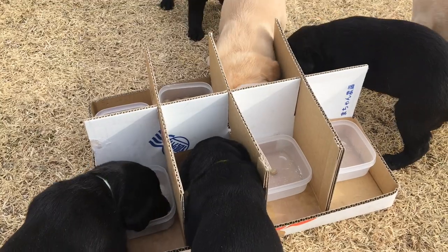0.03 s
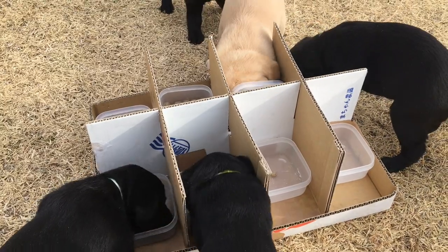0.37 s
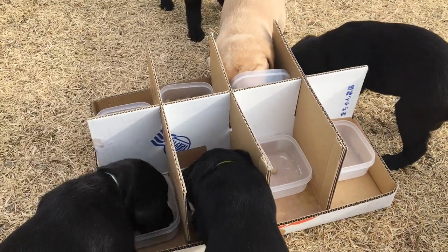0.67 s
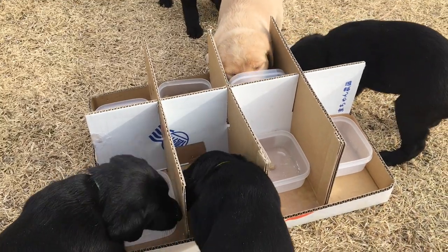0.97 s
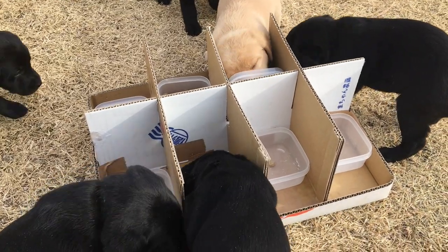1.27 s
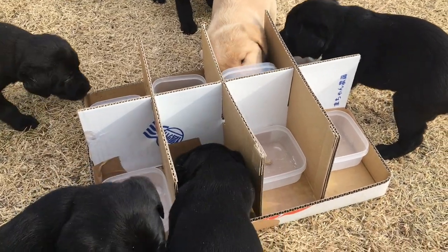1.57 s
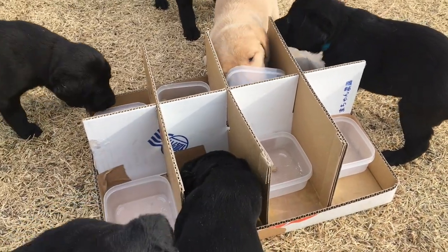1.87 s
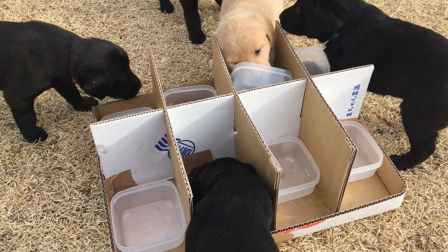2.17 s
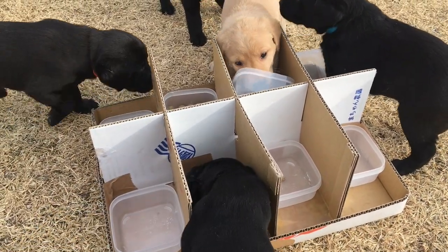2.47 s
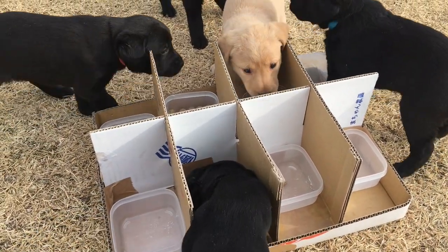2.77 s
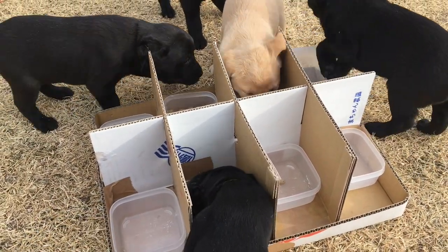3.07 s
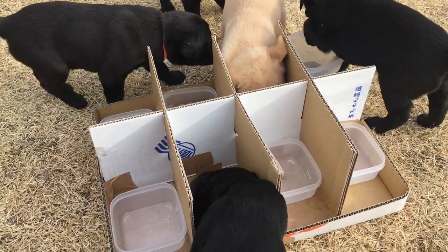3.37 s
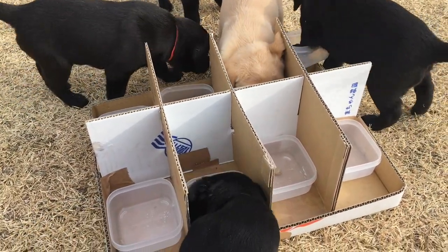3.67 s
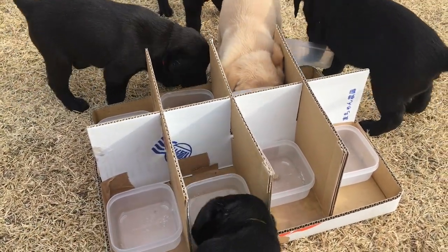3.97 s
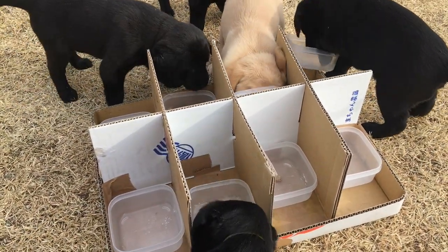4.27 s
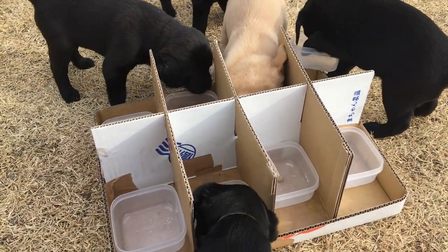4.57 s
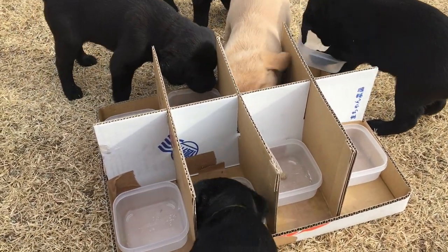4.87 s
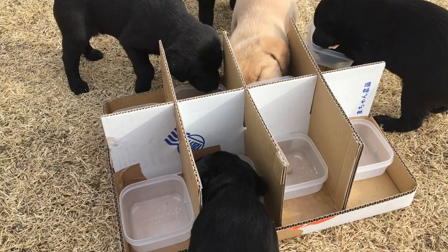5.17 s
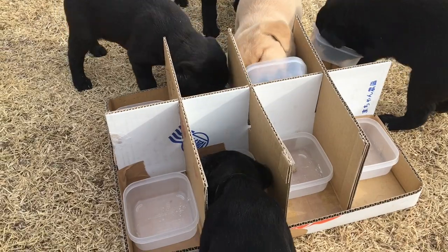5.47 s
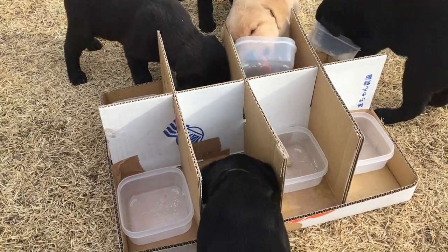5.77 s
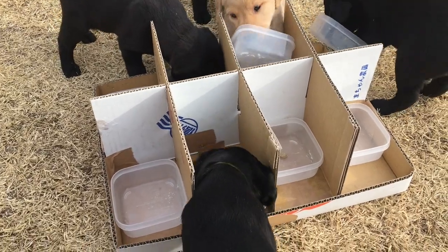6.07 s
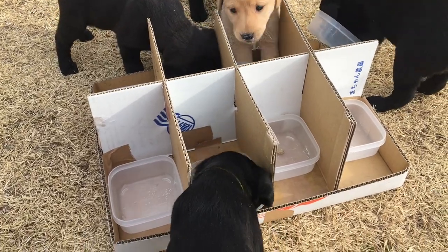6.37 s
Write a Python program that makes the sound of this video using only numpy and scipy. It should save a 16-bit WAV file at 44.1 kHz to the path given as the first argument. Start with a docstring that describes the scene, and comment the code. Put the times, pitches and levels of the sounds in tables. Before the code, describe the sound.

Puppies lick and nose empty plastic tubs in a cardboard box, with close hollow knocks, sharp clicks and wet smacks outdoors.

```python
"""Empty plastic tubs knock about in a divided cardboard box as puppies lick and nose them, close up.
Each knock rings a tub's thin floor and thumps the card; teeth and claws snap on the rims, and wet
tongues drag the tubs and smack. Fur brushes the dividers and paws crackle in the dry lawn around the box.
One microphone in the open, with quiet outdoor air and a low hum far off."""
import sys
import numpy as np
from scipy import signal
from scipy.fft import rfft, irfft
from scipy.io import wavfile
from scipy.ndimage import uniform_filter1d

SR = 44100
rng = np.random.default_rng(int(sys.argv[2]) if len(sys.argv) > 2 else 0)


def bounce(signal):
    """Save signal as a 16-bit WAV file at the path given by the first command-line argument."""
    frames = np.transpose(np.atleast_2d(signal))
    limited = np.clip(frames, -1, 1)
    pcm = np.round(limited * 32767).astype(np.int16)
    wavfile.write(sys.argv[1], SR, pcm)


N = 283563

# a tub knocks on the card: start_s, tub_db, centre_hz, box_db, clack_db, decay_factor
TUB_KNOCKS = [(0.086, -50, 640, -35.5, -52, 2.6), (0.102, -29.5, 660, -38.5, -57, 0.8),
              (0.112, -37, 800, -51, -44, 1.1), (0.151, -32, 1030, -40, -35.5, 1.15),
              (0.164, -33.5, 670, -33.5, -48, 1.2), (0.283, -47, 760, -70, -55, 1.06),
              (0.459, -42, 840, -51, -48, 1.5), (0.552, -43, 840, -64, -39, .75),
              (0.566, -32, 730, -42, -45, 1.4), (0.615, -43.5, 586, -65, -60, 1.2),
              (0.713, -37.5, 815, -45, -52, 1.1), (0.865, -49.5, 740, -51, -70, 1.15),
              (0.917, -43.5, 560, -45, -70, .5), (1.306, -60, 750, -48, -62, 1.2),
              (1.3221, -39.5, 740, -42.5, -43.5, 1.2), (1.563, -44, 690, -54, -60, .9),
              (1.869, -40, 600, -49, -51, 1.1), (1.881, -38, 664, -37, -46.5, 0.7),
              (2.226, -45.5, 670, -44.5, -65, 1.2), (2.308, -52, 600, -54, -57, 0.82),
              (2.4404, -47, 600, -46.5, -67, 0.46), (2.6236, -23.5, 780, -34.5, -38.5, 1.16),
              (2.6731, -26.5, 786, -40.5, -42, 1.1), (2.687, -34.5, 710, -37, -52, 0.42),
              (2.705, -38, 660, -45, -45, 0.86), (2.741, -44, 640, -58, -49, 0.94),
              (2.7602, -31, 660, -39, -43, .8), (3.001, -48.5, 814, -57, -67, 1),
              (3.111, -46, 850, -44.5, -64, 1), (3.1583, -32.5, 930, -27.5, -30.5, 1.1),
              (3.167, -30, 750, -34.5, -40, 0.87), (3.334, -34.5, 595, -31.5, -59, 0.62),
              (3.392, -39, 1110, -38.5, -42, 1.04), (3.441, -40, 620, -35.5, -52, 1),
              (3.56, -39, 680, -45, -60, 0.99), (3.633, -51, 640, -42, -45, 1.1),
              (3.652, -49.5, 760, -45, -44, 1.7), (3.993, -50, 1060, -44.5, -38, 0.66),
              (4.345, -33, 540, -60, -51, 0.47), (4.3695, -17, 795, -30, -32.5, 0.73),
              (4.38, -48, 550, -33, -45, 0.6), (4.393, -42, 800, -39, -71, 1),
              (4.412, -48, 500, -41, -74, 1.1), (4.485, -37.5, 580, -64, -59, 0.39),
              (4.614, -45, 580, -36, -39.5, 1), (4.6573, -21.5, 850, -30, -37.5, 0.87),
              (4.7004, -33.5, 493, -64, -43.5, 0.99), (4.7733, -39.5, 570, -50, -55, 1.1),
              (4.834, -32.5, 610, -43, -49, 1.3), (4.904, -39.5, 720, -50, -49, 1.4),
              (4.97, -44.5, 950, -53, -51.5, 1.3), (5.219, -44, 595, -52, -56, 0.16),
              (5.342, -40.5, 615, -46, -43.5, 0.8), (5.428, -35, 695, -44.5, -42.5, 1.1),
              (5.45, -44.5, 870, -46, -51, .8), (5.553, -43.5, 950, -66, -49, 1.4),
              (5.609, -26, 585, -47, -55, 0.68), (5.625, -29, 750, -34.5, -39.5, 0.76),
              (5.682, -41, 955, -54, -44.5, 1.3), (5.7124, -34, 710, -41, -56, .9),
              (5.72, -40, 840, -43, -46, 2.4), (5.8168, -33.5, 865, -46, -32.5, 0.83),
              (5.839, -33.5, 830, -60, -37, 1), (5.849, -32.5, 694, -38, -40, .7),
              (5.857, -38, 580, -31.5, -48, 1.3), (5.8744, -32.5, 640, -51, -67, 0.51),
              (6.219, -48, 710, -42.5, -50, 1), (6.2668, -22, 550, -25.5, -38, 0.38),
              (6.3433, -47, 700, -61, -49, 0.6), (6.366, -15, 840, -31.5, -26, 0.69),
              (6.379, -31, 600, -57, -49, 0.49), (6.393, -35, 640, -61, -49, 1),
              (6.407, -35, 657, -53, -63, 0.97)]
# teeth and claws on a rim: start_s, peak_db, centre_hz
RIM_SNAPS = [(0.0438, -39.5, 3320), (0.148, -35, 3500), (0.5515, -39, 3990), (0.9004, -44.5, 4420),
             (1.2769, -42.5, 3640), (1.322, -35.5, 3900), (1.954, -40, 6700), (2.7063, -37, 4550),
             (3.0985, -38, 3650), (3.1577, -29.5, 3950), (3.3885, -40.5, 3920), (3.651, -33, 12800),
             (3.875, -42, 4320), (4.0093, -33, 12900), (4.3701, -37, 9000), (4.658, -33.5, 11000),
             (4.768, -41.5, 3900), (5.2846, -41, 11300), (5.3412, -23.5, 5700), (5.924, -33.5, 9000),
             (5.9393, -35.5, 3400), (6.2046, -38.5, 4080), (6.243, -40, 4230), (6.2567, -44, 12000),
             (6.2668, -27.5, 7600), (6.3665, -17.5, 5870)]
# pushes of a tongue or muzzle across a tub: middle_s, length_s, rub_db, wet_db
TONGUE_STROKES = [(0.05, 0.26, -53.5, -60), (0.41, 0.24, -57.5, -59), (0.64, 0.33, -59.5, -60),
                  (1.067, 0.13, -59, -62.5), (1.416, 0.13, -57, -63), (1.671, 0.31, -63.5, -55.5),
                  (1.899, 0.11, -51.5, -55.5), (2.172, 0.33, -68, -59.5), (2.555, 0.15, -66, -68),
                  (2.745, 0.11, -55.5, -72), (2.89, 0.06, -69, -65), (3.128, 0.17, -54.5, -53),
                  (3.465, 0.11, -52.5, -56), (3.608, 0.25, -53, -57), (3.885, 0.17, -61, -54.5),
                  (3.983, 0.12, -53, -51), (4.132, .16, -63, -59), (4.359, 0.21, -51, -65),
                  (4.85, .2, -50.5, -62.5), (5.17, 0.4, -52, -58.5), (5.435, .16, -54.5, -57),
                  (5.66, 0.42, -53, -64), (5.822, 0.21, -51.5, -51.5), (6.068, .07, -60, -84),
                  (6.351, 0.19, -55, -57)]
# smacks of lips and tongues: start_s, peak_db, pitch_hz
LIP_SMACKS = [(0.3292, -39, 1920), (0.334, -37, 1440), (0.4453, -36.5, 1370), (0.504, -41.5, 1180),
              (0.726, -42, 1750), (0.795, -43, 1380), (1.152, -37, 1220), (1.951, -41.5, 1940),
              (4.1798, -46, 1240), (5.199, -39.5, 1350), (6.089, -41.5, 1080)]
# fur and muzzles along walls and tubs: start_s, length_s, level_db, centre_hz, width_octaves
FUR_BRUSHES = [(0.347, 0.12, -62, 2950, 0.24), (0.612, 0.097, -57, 9300, 0.099),
               (0.639, 0.1, -62.5, 3550, 0.14), (0.63, 0.12, -67, 5700, 0.12), (.63, .11, -64, 13000, .25),
               (1.326, 0.059, -49.5, 603, 0.11), (1.646, 0.068, -54, 587, 0.22),
               (2.576, 0.048, -55, 1700, 0.17), (3.093, 0.067, -56, 1150, 0.54),
               (3.86, 0.072, -50.5, 1990, 0.093), (3.859, 0.064, -52.5, 3250, 0.52),
               (3.861, 0.057, -54.5, 6560, 0.65), (4.279, 0.069, -65, 3600, 0.027),
               (4.801, 0.13, -54.5, 576, 0.18)]
# a paw shifts in the grass: middle_s, length_s, level_db
PAW_STEPS = [(0.07, .22, -60.5), (0.4, 0.14, -62.5), (0.69, .14, -56.5), (0.87, 0.25, -64.5),
             (1.07, 0.11, -63.5), (1.54, 0.42, -62.5), (2.01, 0.22, -62), (2.66, 0.21, -62.5),
             (3.14, 0.11, -51.5), (3.31, 0.28, -60), (3.64, 0.1, -57.5), (3.94, 0.13, -58),
             (4.17, 0.1, -65), (4.45, 0.29, -67.5), (4.84, 0.31, -62), (5.14, 0.18, -59.5),
             (5.36, 0.12, -58), (5.6, 0.35, -62), (5.8, 0.23, -55), (5.96, .08, -56.5), (6.31, 0.37, -69)]
# modes of a tub's thin floor, the card box and a stiff rim: pitch_hz, level_db, t60_s
TUB_MODES = [(346, 2.5, 0.041), (437.5, -2.5, 0.058), (529.5, -1, 0.075), (627, -8, 0.053),
             (656, 9.5, 0.019), (751, 5.5, 0.018), (808, 1.5, 0.02), (867, -0.5, 0.035), (1015, 6.5, 0.024),
             (1100, 5.5, 0.016), (1264, 4.5, 0.028), (1363, -11.5, 0.096), (1570, -31, 0.085)]
BOX_MODES = [(204.5, -1.5, 0.033), (259, -6.5, 0.058), (281, 7.5, 0.017), (336, -8.5, 0.037),
             (397, -7, 0.063)]
RIM_MODES = [(1440, 16, 0.017), (2180, -0.5, 0.027), (3230, -2, 0.0088), (3655, 0, 0.02),
             (4050, -3.5, 0.02), (6500, -30, 0.02), (6610, -2.5, 0.0087), (7630, -4.5, 0.0097),
             (9230, 2, 0.0039), (11600, -17, 0.005), (12700, 6, 0.0073)]
# resonances of a tub pressed and dragged on the card: centre_hz, width_hz, level_db
RUB_RESONANCES = [(246, 250, -4.5), (553, 240, 0), (706, 150, -1.5), (990, 150, -10.5), (1442, 270, -12.5)]
# spectra of rim clack, wet tongue and outdoor air at the microphone: frequency_hz, level_db
CLACK_SPECTRUM = [(700, -21.5), (1300, -1), (1700, 4.5), (2050, -0.5), (2450, -5.5), (3200, -8),
                  (4200, -14.5), (5200, -18), (9000, -62.5)]
LICK_SPECTRUM = [(400, -34), (800, -6), (1100, -1), (1600, -4), (2000, -3), (2450, -8.5), (3100, -8.5),
                 (3900, -17.5), (5000, -14), (9000, -20.5)]
AIR_SPECTRUM = [(15, -41), (25, -13), (64, 2), (108, -2), (190, -1), (354, -9.5), (659, -13.5),
                (1700, -18.5), (2610, -24), (4370, -25), (4870, -50.5), (6050, -28), (10400, -29),
                (13200, -25.5), (16000, -31)]
# contact tick and dry grass crackle, both with the microphone's notches near 5, 7.3 and 10.3 kHz:
# frequency_hz, level_db
TICK_AT_MIC = [(1500, -18), (3500, -6), (5000, -10.5), (6100, 3.5), (7400, -3), (8500, 0), (10200, -10.5),
               (11300, 0), (13500, -26), (16000, -7)]
GRASS_AT_MIC = [(1500, -28), (3500, 5.5), (5000, 1), (6200, 5), (7400, 0.5), (8800, 5.5), (10300, 0.5),
                (11500, 4), (16000, 1)]
# short ring of the box's compartments: frequency_hz, t60_s
COMPARTMENT_DECAY = [(150, 0.18), (600, 0.051), (1500, 0.044), (4000, 0.028), (14000, 0.03)]


def knock(tub_db, centre_hz, box_db, clack_db, decay_factor):
    """A nudged tub ticks on the card, its rim clacks, its floor rings and the box thumps."""
    t = np.arange(SR // 8) / SR
    # the tick grows with ring and clack, and is sharper when the tub is held tight and rings briefly
    tick_db = (tub_db + clack_db) / 2 - 18.5 - 10.5 * (decay_factor - 1)
    tub = ring(TUB_MODES, t, decay_factor, lag=0.029, centre_hz=centre_hz, octaves=0.71, flex=0.052)
    box = ring(BOX_MODES, t, decay_factor, lag=0.016, centre_hz=260, octaves=0.92, flex=0.072)
    out = amp(tub_db) * tub + amp(box_db) * box
    add(out, .0004, amp(clack_db) * chatter(CLACK_SPECTRUM, t, t60_s=0.027 * decay_factor))
    add(out, .0004, amp(tick_db) * chatter(TICK_AT_MIC, t, t60_s=0.015 * decay_factor))
    return out


def tub_knocks():
    """The tubs are shoved against the walls and floor of the box."""
    out = np.zeros(N)
    for start_s, *blow in TUB_KNOCKS:
        add(out, start_s, knock(*blow))
    return out


def tub_rattles(per_s=7, most_per_stroke=3):
    """Each stroke may rattle its tub a few times; harder pushes rattle louder."""
    out = np.zeros(N)
    for middle_s, length_s, rub_db, _ in TONGUE_STROKES:
        tub_db = rub_db + 10
        for chance, place in rng.random((most_per_stroke, 2)):
            if chance < per_s * length_s / most_per_stroke:
                rattle = knock(tub_db, 670, box_db=tub_db - 13, clack_db=tub_db - 19, decay_factor=0.84)
                add(out, middle_s + length_s * (place - .5), rattle)
    return out


def rim_snaps():
    """Teeth and claws, hard and small, excite the high modes of a rim."""
    out, t = np.zeros(N), np.arange(SR // 16) / SR
    for start_s, peak_db, hz in RIM_SNAPS:
        rim = ring(RIM_MODES, t, decay_factor=0.82, lag=0.01954, centre_hz=hz, octaves=0.83, flex=.008)
        tick = chatter(TICK_AT_MIC, t, t60_s=0.01)
        add(out, start_s, amp(peak_db) * unit_peak(rim + 0.7 * tick))
    return out


def ring(modes, t, decay_factor, lag, centre_hz, octaves, flex):
    """Struck modes; the spot that is hit weights them, flexing detunes them, the low ones arrive late."""
    hz, db, t60_s = np.transpose(modes)[:, :, None]
    spot, bend = rng.standard_normal((2, len(hz), 1))
    weight = amp(db + 2 * spot) * bell(hz, centre_hz, octaves)
    age_s = np.maximum(t - lag / np.sqrt(hz), 0)  # bending waves speed up with the root of frequency
    decay = amp(-60 * age_s / (t60_s * decay_factor))
    waves = weight * decay * np.sin(2 * np.pi * hz * (1 + flex * bend) * age_s)
    # small, light things push out no deep bass
    low_cut = signal.butter(4, 0.93 * hz.min(), "highpass", fs=SR, output="sos")
    return unit_hit(signal.sosfilt(low_cut, waves.sum(0)))


def chatter(spectrum, t, t60_s):
    """A brief chatter of contact: noise that dies away fast."""
    return unit_hit(colour(rng.standard_normal(len(t)) * amp(-60 * t / t60_s), spectrum))


def licking():
    """Tongues drag the tubs over the card and work wetly on the plastic, nuzzling between strokes."""
    drag = slips(per_s=300, spread_db=3.5, smooth=0.49)
    rub = unit_rms(resonate(drag, RUB_RESONANCES)) * amp(2 * wander(45))
    lick = slips(per_s=280, spread_db=3.0, smooth=0.99)
    tongue = unit_rms(colour(lick, LICK_SPECTRUM)) * amp(1.74 * wander(50))
    wet = tongue + amp(-8.5) * saliva_bubbles()
    rub_gain = swells([(s, length_s, db) for s, length_s, db, _ in TONGUE_STROKES], rest_db=-70.5)
    wet_gain = swells([(s, length_s, db) for s, length_s, _, db in TONGUE_STROKES], rest_db=-68.5)
    return rub * rub_gain + wet * wet_gain


def saliva_bubbles():
    """Stray bubbles of saliva pop, each size with its own pitch."""
    out, pitches_hz = np.zeros(N), np.geomspace(1200, 3700, 8)
    for hz in pitches_hz:
        pops = slips(per_s=9, spread_db=1.0, smooth=0)
        out += resonate(pops, [(hz, hz / 4, 0)]) * pitches_hz[0] / hz
    return unit_rms(out)


def lip_smacks(t60_s=0.021):
    """A film of saliva parts, and the little cavity behind it sputters."""
    out, t = np.zeros(N), np.arange(SR // 16) / SR
    for start_s, peak_db, pitch_hz in LIP_SMACKS:
        sputter = noise_band(len(t), pitch_hz, octaves=0.33) * amp(-60 * t / t60_s)
        add(out, start_s, amp(peak_db) * unit_peak(sputter))
    return out


def compartments(x):
    """The card walls scatter each sound for a moment; the open lawn returns nothing."""
    hz, t, noise = signal.stft(rng.standard_normal(SR // 4), SR, nperseg=256)
    decay = amp(-60 * t / value_at(COMPARTMENT_DECAY, hz)[:, None])
    tail = signal.istft(noise * decay, SR, nperseg=256)[1]
    tail *= np.clip(np.arange(len(tail)) / SR / 0.0015 - .5, 0, 1)  # fades in after the direct sound
    return signal.oaconvolve(x, tail / np.linalg.norm(tail))[:N]


def fur_brushes():
    """Fur and muzzles slide along walls and tubs in soft swells of friction; the narrowest squeak."""
    out = np.zeros(N)
    for start_s, length_s, level_db, centre_hz, octaves in FUR_BRUSHES:
        count = round(length_s * SR)
        friction = noise_band(SR // 2, centre_hz, octaves)[:count]
        add(out, start_s, amp(level_db) * friction * signal.windows.tukey(count, .6))
    return out


def paws_in_grass():
    """Dry blades of grass crackle under shifting feet; the litter never stands quite still."""
    gain = swells(PAW_STEPS, rest_db=-70) * amp(3.2 * wander(60))
    crackle = slips(per_s=220, spread_db=4.0, smooth=1.9)
    return gain * unit_rms(colour(crackle, GRASS_AT_MIC))


def outdoors(air_db=-60, hum_db=-63.5):
    """Quiet air over the lawn and, far off, a hum that wavers in pitch and level."""
    air = unit_rms(colour(rng.standard_normal(N), AIR_SPECTRUM, size=16384))
    hum_hz = 56.8 + 2.22 * wander(32)
    hum = np.sin(2 * np.pi * np.cumsum(hum_hz) / SR) * amp(2 * wander(13))
    return amp(air_db) * air + amp(hum_db) * unit_rms(hum)


def slips(per_s, spread_db, smooth):
    """Tiny slips of unequal size over a smooth friction noise."""
    size = amp(spread_db * np.minimum(rng.exponential(1, N), 4)) * rng.choice([-1, 1], N)
    impulses = unit_rms(size * (rng.random(N) < per_s / SR))
    return unit_rms(impulses + smooth * rng.standard_normal(N))


def swells(movements, rest_db):
    """Gain of movements whose pressure builds and eases, over a resting level."""
    t, power = np.arange(N) / SR, np.full(N, amp(rest_db) ** 2)
    for middle_s, length_s, level_db in movements:
        inside = abs(t - middle_s) < length_s / 2
        pressure = abs(np.cos(np.pi * (t[inside] - middle_s) / length_s)) ** 1.31
        power[inside] += (amp(level_db) * pressure) ** 2
    return np.sqrt(power)


def wander(per_s):
    """Random drift of rms 1."""
    knots = rng.standard_normal(4000)
    return unit_rms(np.interp(np.arange(N) / SR * per_s, np.arange(len(knots)), knots))


def resonate(x, resonances):
    """Passes x through broad resonances, each applied twice for steep flanks."""
    out = np.zeros(len(x))
    for hz, width_hz, level_db in resonances:
        b, a = signal.iirpeak(hz, hz / width_hz, fs=SR)
        delayed = np.roll(x, round(SR / hz))
        out += amp(level_db) * signal.lfilter(b, a, signal.lfilter(b, a, delayed))
    return out


def colour(x, spectrum, size=4096):
    """Causal filter with the given spectrum."""
    log_gain = np.log(amp(value_at(spectrum, abs(np.fft.fftfreq(size, 1 / SR)))))
    taps = np.fft.ifft(np.exp(np.conj(signal.hilbert(log_gain)))).real
    return signal.oaconvolve(x, taps[:size // 2])[:len(x)]


def noise_band(count, centre_hz, octaves):
    """Noise in one bell-shaped band."""
    hz = np.fft.rfftfreq(count, 1 / SR) + 1
    return unit_rms(irfft(rfft(rng.standard_normal(count)) * bell(hz, centre_hz, octaves), count))


def bell(hz, centre_hz, octaves):
    """Bell curve on a log-frequency axis."""
    return np.exp(-.5 * (np.log2(hz / centre_hz) / octaves) ** 2)


def value_at(table, hz):
    """Reads a table on a log-frequency axis."""
    table_hz, values = np.transpose(table)
    return np.interp(np.log(hz + 1), np.log(table_hz + 1), values)


def add(mix, start_s, sound):
    """Mixes a sound in at start_s."""
    part = mix[max(round(start_s * SR), 0):][:len(sound)]
    part += sound[:len(part)]


def amp(db):
    """Decibels to gain."""
    return 10 ** (np.asarray(db) / 20)


def unit_rms(x):
    """Scales to rms 1."""
    return x / np.sqrt(np.mean(x ** 2) + 1e-20)


def unit_hit(x):
    """Scales a hit so that its loudest three milliseconds have rms 1."""
    return x / np.sqrt(uniform_filter1d(x ** 2, 128, mode="constant").max() + 1e-20)


def unit_peak(x):
    """Scales a click to peak 1."""
    return x / abs(x).max()


def scene():
    """Tubs and tongues up close share the box's short ring; fur, grass and air arrive dry. Mono."""
    box = tub_knocks() + tub_rattles() + rim_snaps() + lip_smacks() + licking()
    return (box + amp(-17) * compartments(box) + fur_brushes() + paws_in_grass() + outdoors())[None]


def record(dry):
    """The recorder cuts off above 16 kHz."""
    low_pass = signal.firwin(511, 16000, window=("kaiser", 9), fs=SR)
    return signal.oaconvolve(dry, low_pass[None], "same")


dry = scene()
out = record(dry)
bounce(out)
```